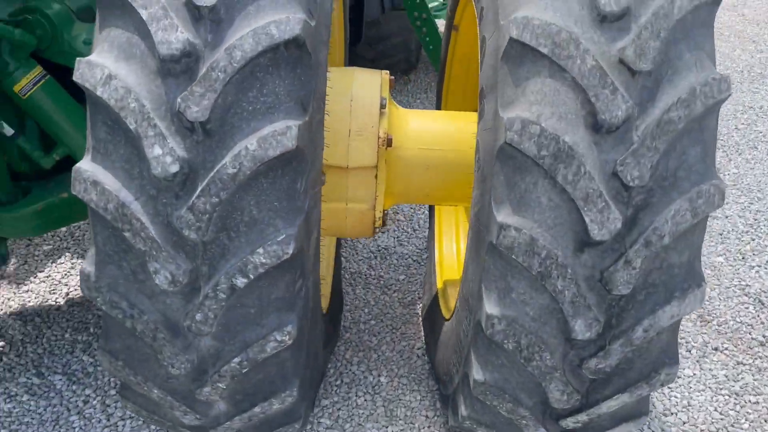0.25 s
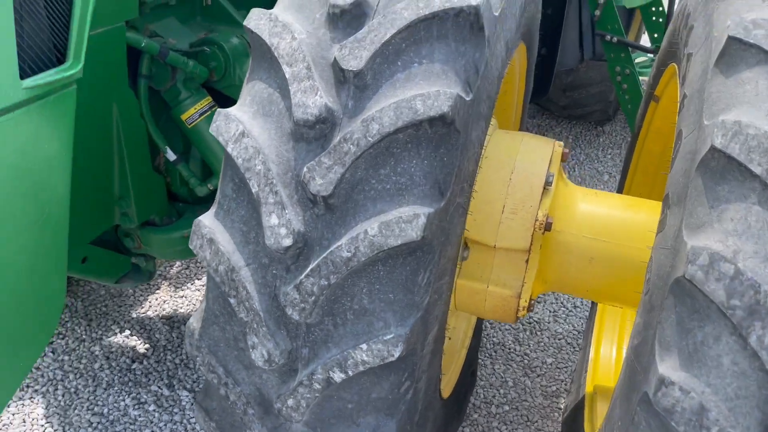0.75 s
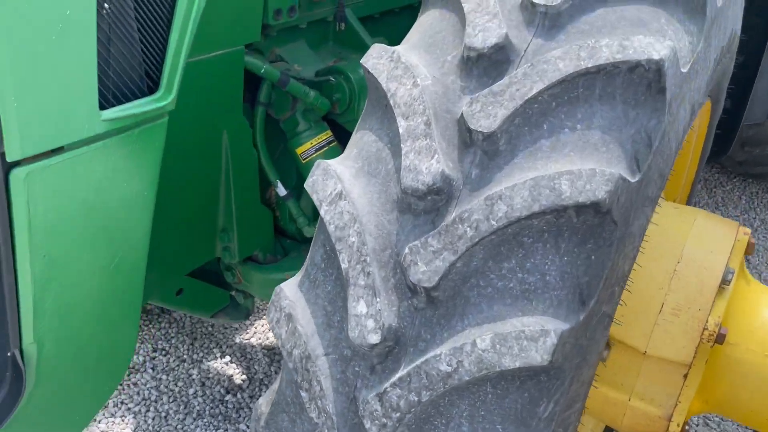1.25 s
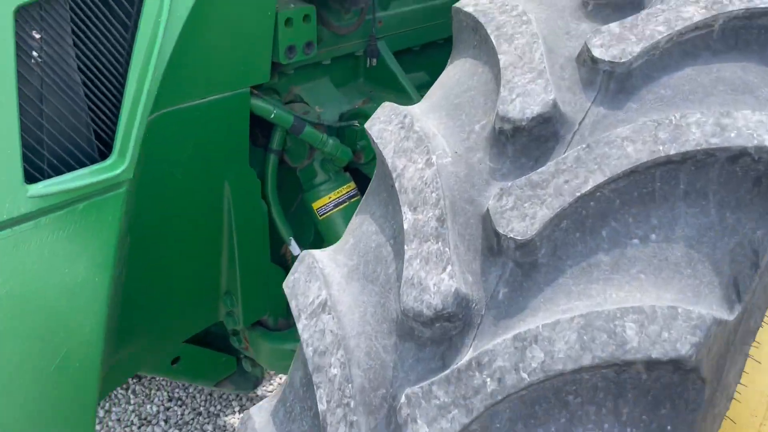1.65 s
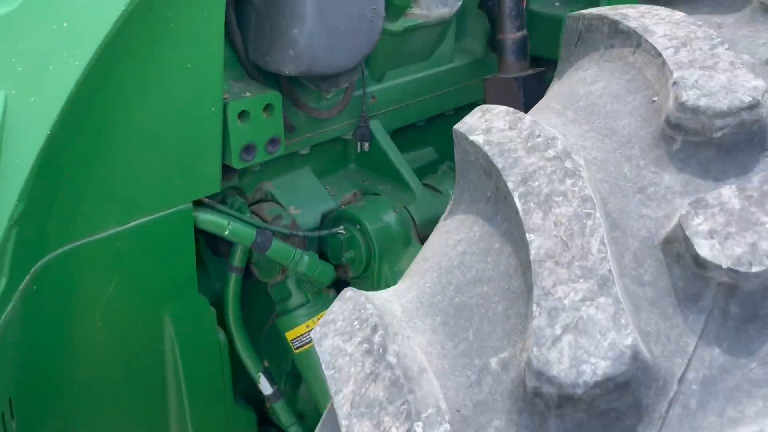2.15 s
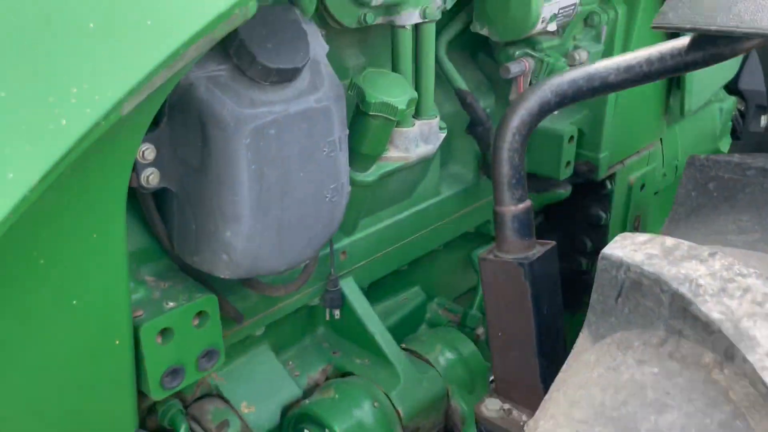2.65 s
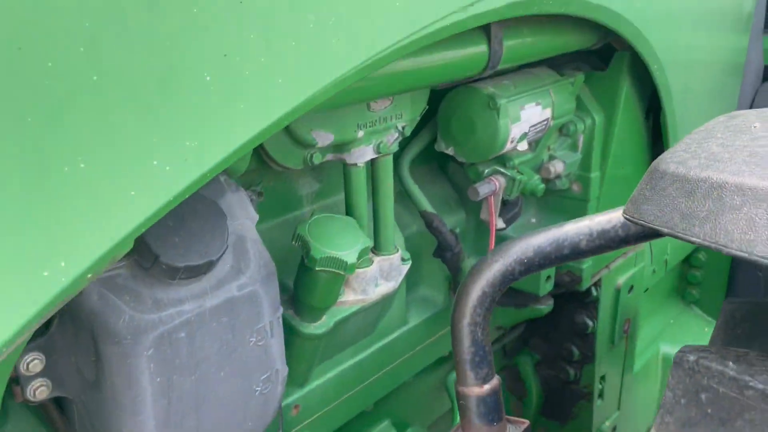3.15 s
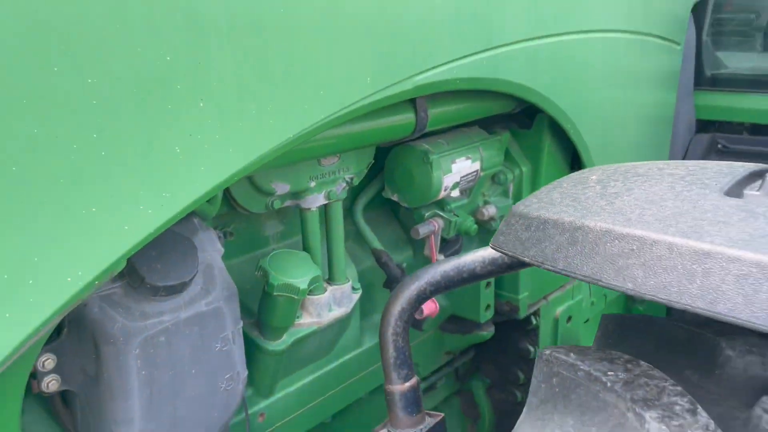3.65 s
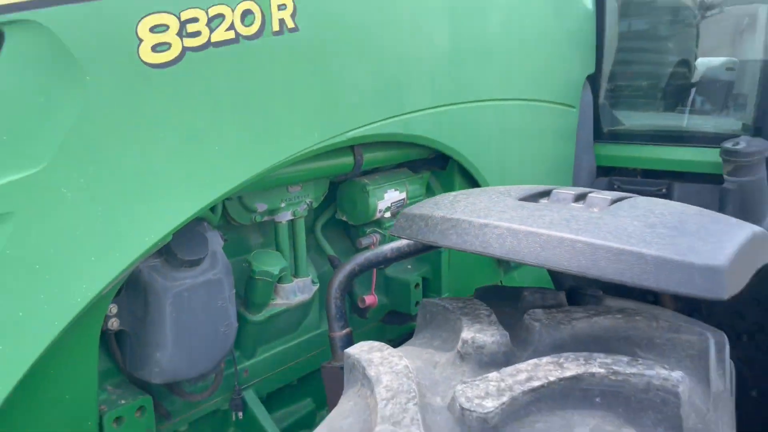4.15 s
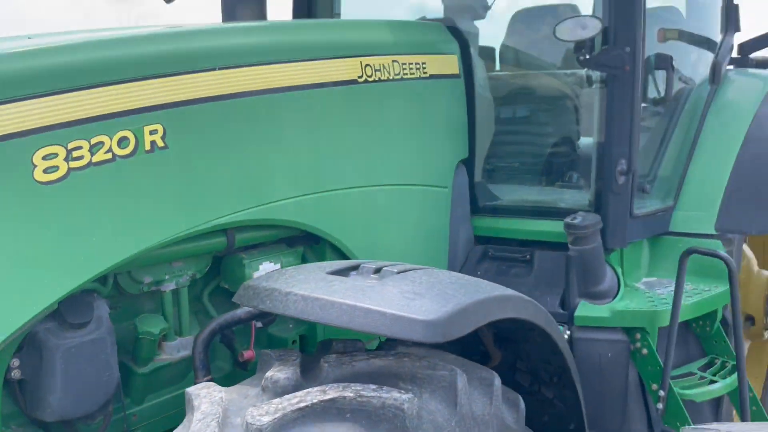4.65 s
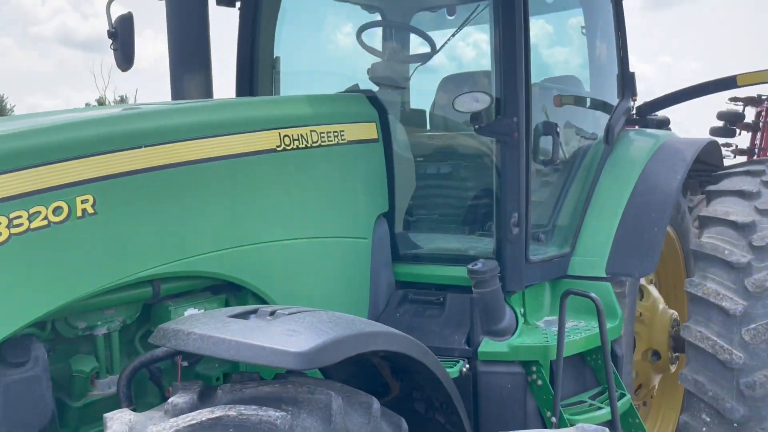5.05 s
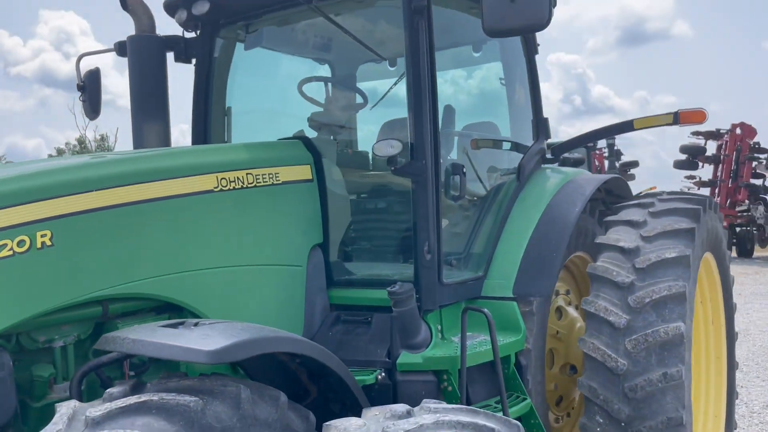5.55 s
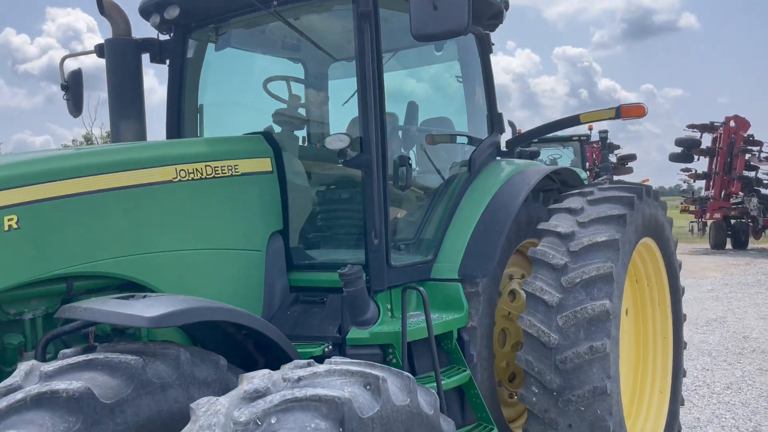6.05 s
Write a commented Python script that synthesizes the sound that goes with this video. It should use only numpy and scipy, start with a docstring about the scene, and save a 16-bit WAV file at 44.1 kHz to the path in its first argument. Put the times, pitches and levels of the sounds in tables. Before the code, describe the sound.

Heard from a microphone carried along its side in a gravel yard, a tractor's diesel engine ticks over evenly, with a droning fan and rattling, lightly ringing metal covers. It gets a little louder, then a blast of fan air buffets the microphone for over a second, booming and sputtering over the engine. Once the buffeting stops, the same idle is heard more softly.

```python
"""A six-cylinder diesel tractor idles at 900 rpm on a gravel yard as a hand-held mic walks along it. Every
firing knocks on the block and rings its covers; the fan hums, the exhaust throbs, gears whine, and tyre and
gravel throw the clatter back. Beside the engine bay the fan's air stream thumps and crackles on the mic while
the engine sinks away; past the stream the idle goes on, quieter."""
import sys
import numpy as np
from scipy import signal
from scipy.fft import rfft, irfft
from scipy.io import wavfile
from scipy.ndimage import uniform_filter1d, minimum_filter1d, map_coordinates

SR = 44100
rng = np.random.default_rng(int(sys.argv[2]) if len(sys.argv) > 2 else 0)


def put_to_file(sound):
    """Save the sound as 16-bit audio at rate SR, in the file named by the first command-line argument."""
    columns = np.atleast_2d(sound).T  # one column per channel
    safe = np.clip(columns, -1, 1)
    whole_steps = np.round(safe * 32767)
    wavfile.write(sys.argv[1], SR, whole_steps.astype(np.int16))


N = 277830

CRANK_HZ = 15
T = np.arange(N) / SR
HZ = np.maximum(np.arange(N // 2 + 1) * SR / N, 1)


def from_db(db):
    """Decibels to gain."""
    return 10 ** (np.asarray(db) / 20)


def rms_one(x):
    """Scale to unit power."""
    return x / np.sqrt(np.mean(x ** 2) + 1e-20)


def in_time(rows):
    """Each column of a curve table at every sample."""
    s, *columns = np.transpose(rows)
    return [np.interp(T, s, c) for c in columns]


def over_hz(points):
    """A spectrum table at every frequency."""
    hz, value = np.transpose(points)
    return np.interp(np.log(HZ), np.log(hz), value)


def drift(rate):
    """Smooth chance that changes about rate times a second; spread 1."""
    slow_hz = HZ[:4096]
    slow = irfft(rfft(rng.standard_normal(2 * len(slow_hz) - 2)) / (1 + (slow_hz / rate) ** 2) ** 2)
    return np.interp(T, np.linspace(0, T[-1], len(slow)), rms_one(slow))


def band(low_hz, high_hz):
    """Gain of a steep band-pass."""
    return 1 / np.sqrt((1 + (low_hz / HZ) ** 10) * (1 + (HZ / high_hz) ** 10))


def tone(cycles, waver_db, wander_rad):
    """A line of rms 1 that wavers in level and phase."""
    level, phase = drift(14), drift(9)
    return np.sqrt(2) * from_db(waver_db * level) * np.cos(2 * np.pi * cycles + wander_rad * phase)


def coloured(spectra, gain):
    """Mid and side spectra become a stereo pair of this colour; rms 1."""
    mid, side = irfft(spectra * gain, N)
    return rms_one(np.array([mid + side, mid - side]))


# Stereo image of the noises: f/Hz, left-right correlation/0-1
STEREO_LIKENESS = [(40, 1), (70, 0.78), (130, 0.81), (290, 0.82), (640, 0.55), (1400, 0.23), (3100, 0.57),
                   (6500, 0.72), (8000, 1), (16000, 1)]
def mid_and_side(white):
    """Two noises as mid and side spectra: narrow in the bass and the top, wide in the mids."""
    alike = np.clip(over_hz(STEREO_LIKENESS), 0, .99)
    return rfft(white) * np.sqrt([1 + alike, 1 - alike])


# Crank speed as heard, a little higher on the way in: t/s, f/Hz
CRANK_SPEED = [(0, 15.02), (2.6, 15.02), (3.8, 14.97), (6.3, 14.97)]
def crank_turns():
    """Turns of the crankshaft since the start."""
    return np.cumsum(in_time(CRANK_SPEED)[0]) / SR


# Accent of each cylinder, in firing order: level/dB
CYLINDER_ACCENTS = [9.5, 5.0, 6.3, 8.2, 5.3, 5.5]
def knocks(rise_s, fall_s, first_s=0.0021):
    """Envelope of the firings, three a turn: a quick attack and a decay, uneven in strength."""
    firings = 3 * crank_turns()
    at = np.searchsorted(firings, np.arange(int(firings[-1]))) + round(first_s * SR)
    blows = np.zeros(N)
    blows[at] = from_db(np.resize(CYLINDER_ACCENTS, len(at)) + rng.uniform(-5.5, 1, len(at)))
    age = T[:SR // 10]
    shape = (1 - np.exp(-age / rise_s)) * np.exp(-age / fall_s)
    return rms_one(signal.fftconvolve(blows, shape)[:N])


def shaking(repeat_share, ripple_db, renew_s):
    """Vibration that partly repeats every two turns, ribbed by modes that shift as the mic moves."""
    cycle = rng.standard_normal((2, round(2 * SR / CRANK_HZ)))
    looped = cycle[:, np.arange(N) % cycle.shape[1]]
    white = np.sqrt(repeat_share) * looped + np.sqrt(1 - repeat_share) * rng.standard_normal((2, N))
    hz, s, cells = signal.stft(white, SR, nperseg=4096)
    grid = np.meshgrid(hz / 35, s / renew_s, indexing="ij")   # a random gain every 35 Hz
    ribs = map_coordinates(rng.standard_normal((640, 64)), grid, order=3, mode="mirror")
    ripple = ribs * (hz / (hz + 1500))[:, None]   # shallower in the bass
    _, ribbed = signal.istft(cells * from_db(ripple_db * ripple), SR)
    return mid_and_side(ribbed[:, :N])


def ramp(start_s, length_s):
    """Goes from 0 to 1 in a straight line."""
    return np.clip((T - start_s) / length_s, 0, 1)


# Fader of the engine's hiss at the mic, deep down while the gust blows: t/s, level/dB
HISS_FADER = [(0, -38.5), (0.7, -37.5), (2.21, -32), (2.81, -33), (3.08, -48), (3.5, -47), (3.8, -44.5),
              (4.16, -48), (4.25, -43), (4.9, -46.5), (6.3, -50)]
# Rumble, drone, clatter, rattle: dip end/s, recovery/s, dip/dB, opening level/dB, share of hiss swing
LAYER_RIDES = [(4.9, 0.56, 7.5, -30, 0.9), (4.66, 0.14, 13.5, -21, 0.86), (4.6, 0.29, 4, -25, 0.94),
               (5.13, 0.39, -2, -32.0, 0.99)]
def engine_levels(dip_start_s=1.975, dip_fall_s=1):
    """All layers follow the hiss fader; the low ones dip further while the air stream blows and come back late."""
    hiss_db, = in_time(HISS_FADER)
    swing_db = hiss_db - hiss_db[0]
    sunk = ramp(dip_start_s, dip_fall_s)
    layers = [db + follows * swing_db - dip_db * sunk * (1 - ramp(end_s, recovery_s))
              for end_s, recovery_s, dip_db, db, follows in LAYER_RIDES]
    return layers + [hiss_db]


# EQ of the engine's body: f/Hz, level/dB
BODY_EQ = [(50, -2), (68, 1.5), (160, 0.5), (290, -2), (400, -9), (620, -4.5), (740, -10), (950, -13.5),
           (1200, -14), (1650, -14)]
# EQ of its metal clatter: f/Hz, level/dB
METAL_EQ = [(1400, -22), (1750, -19), (2150, -14.5), (2500, -19.5), (3100, -22), (3700, -21.5), (4350, -23),
            (5000, -27), (6000, -27), (7000, -25.5), (9700, -24.5), (11200, -26), (13000, -32.5),
            (14500, -26.5), (16000, -45)]
def block_clatter(rumble_db, drone_db, clatter_db, rattle_db, hiss_db, loose_db=2):
    """Firings shake the block, sharpest in the treble; each band rattles loosely in its own way."""
    vibration = shaking(repeat_share=0.3, ripple_db=3.0, renew_s=0.356)
    body, metal = from_db(over_hz(BODY_EQ)), from_db(over_hz(METAL_EQ))

    def part(gain, knock_share):
        knock = knocks(rise_s=0.0028, fall_s=0.015) * from_db(loose_db * np.tanh(drift(30)))
        return coloured(vibration, gain) * np.sqrt(1 - knock_share + knock_share * rms_one(knock) ** 2)

    out = from_db(rumble_db + 0.5) * part(body * band(49, 153), knock_share=0.11)
    out += from_db(drone_db - 4.0) * part(body * band(128, 330), knock_share=0.057)
    out += from_db((drone_db + clatter_db) / 2 - 4.5) * part(body * band(347, 546), knock_share=0.13)
    out += from_db(clatter_db - 1.3) * part(body * band(817, 1294), knock_share=0.19)
    out += from_db(rattle_db - 4.4) * part(metal * band(1680, 3650), knock_share=0.16)
    out += from_db(hiss_db - 0.74) * part(metal * band(4480, 5870), knock_share=0.41)
    out += from_db(hiss_db - 3.5) * part(metal * band(10660, 16500), knock_share=0.75)
    return out


# Upper partials of the fan: multiple of blade rate, level/dB against the drone fader
FAN_PARTIALS = [(3, -15), (4, -20), (5, -15.5), (7, -18.5)]
def fan_hum(hum_db, octave_db, drone_db, blades_per_crank_turn=7.63):
    """The cooling fan's passing blades make a hum with overtones."""
    blades = blades_per_crank_turn * crank_turns()
    hum = from_db(hum_db) * tone(blades, waver_db=0.35, wander_rad=0.071)
    hum += from_db(octave_db) * tone(2 * blades, waver_db=0.8, wander_rad=0.24)
    for k, db in FAN_PARTIALS:
        hum += from_db(drone_db + db) * tone(k * blades, waver_db=1.2, wander_rad=.06 * k)
    return hum


def exhaust_throb(level_db):
    """The exhaust pulses at the firing rate, three a turn: one deep tone."""
    return from_db(level_db) * tone(3 * crank_turns(), waver_db=1.5, wander_rad=0.096)


# Side tones come and go against the main whine: t/s, level/dB
SIDE_TONE_FADER = [(0, 2), (1.3, 4), (2.5, 5), (4.3, -1), (6.3, -6)]
# Trim of each side tone: level/dB
SIDE_TONE_TRIMS = [-10.5, -8, -10.5]
def gear_whine(level_db, main_order=72, side_orders=(57, 78, 84)):
    """Gears sing at multiples of crank speed: one main whine and three softer side tones."""
    turns = crank_turns()
    side_db, = in_time(SIDE_TONE_FADER)
    whine = tone(main_order * turns, waver_db=1.5, wander_rad=0.4)
    for order, db in zip(side_orders, SIDE_TONE_TRIMS):
        whine += from_db(side_db + db) * tone(order * turns, waver_db=1.5, wander_rad=0.45)
    return from_db(level_db) * whine


# Ringing covers: f/Hz, relative level/dB, t/s when the mic passes, swell there/dB
COVER_MODES = [(1953, -8, 1.35, 4), (2040, -18, 4.05, 12), (2183, -7, 2.3, 3), (2400, -14, 5.1, 7),
               (2802, -17.5, 2.2, 5), (3283, -18, 0.9, 6), (4073, -14, 4.05, 9), (4130, -17, 4.0, 6),
               (4289, -14.5, 2.1, 4), (4430, -17, 2.15, 5.5), (4470, -19, 3.3, 9), (5336, -20.5, 2.3, 5),
               (5700, -22, 1.1, 7)]
def cover_ring(level_db, width_hz=27, waver_db=0.7, half_pass_s=0.34):
    """The sharp tick of each firing rings the covers; each swells and fades as the mic passes it."""
    tick_noise = rng.standard_normal((2, N)) * knocks(rise_s=0.00052, fall_s=0.0026)
    ticks = coloured(mid_and_side(tick_noise), 1)
    radius = np.exp(-np.pi * width_hz / SR)
    out = np.zeros((2, N))
    for hz, db, passed_s, swell_db in COVER_MODES:
        resonator = [1, -2 * radius * np.cos(2 * np.pi * hz / SR), radius ** 2]
        ring = signal.lfilter([1, 0, -1], resonator, ticks)
        facing = 1 / (1 + ((T - passed_s) / half_pass_s) ** 4)
        out += from_db(db + swell_db * facing + waver_db * drift(2.7)) * rms_one(ring)
    return from_db(level_db) * out


# Early reflections along the walk: t/s, front tyre lag/ms, gravel lag/ms
ECHO_LAGS = [(0, 3, 5), (0.8, 1.67, 3.4), (1.8, 0.99, 4.5), (2.8, 0.71, 5.4), (4.2, 1.0, 3.3),
             (5, 2.53, 2.5), (6.3, 3.1, 1.73)]
def with_echoes(sound, tyre_db=-22, gravel_db=-16.5):
    """Tyre and gravel throw the clatter back; their changing lags sweep its colour."""
    bright = irfft(rfft(sound) * band(900, 6000), N)
    for lag_ms, db in zip(in_time(ECHO_LAGS), (tyre_db, gravel_db)):
        echo = np.array([np.interp(T - lag_ms / 1000, T, side) for side in bright])
        sound = sound + from_db(db) * echo
    return sound


# Faders of the tones along the walk: t/s, fan hum/dB, its octave/dB, exhaust/dB, gear whine/dB
TONE_FADERS = [(0, -16, -27.5, -25, -37), (0.52, -16, -23.5, -32, -43), (0.7, -15.8, -21.5, -31, -32.5),
               (1.25, -14.5, -22, -32, -31), (1.85, -12.5, -21.5, -35, -34), (2.25, -12, -31.5, -40, -44),
               (2.7, -19.5, -33, -39, -44), (3.2, -35, -41, -47, -62), (3.85, -43, -50, -62, -54),
               (4.15, -36, -54, -62, -59), (4.27, -36, -49, -63, -43), (4.72, -29.5, -42.5, -55, -42),
               (4.92, -26.5, -33, -51, -42), (5.3, -27.5, -33, -50, -41.5), (5.7, -28.5, -35, -46, -52),
               (6.3, -33, -34, -43, -57)]
def engine():
    """The idling diesel: block and covers with their echoes, plus fan, exhaust and gear tones."""
    rumble_db, drone_db, clatter_db, rattle_db, hiss_db = engine_levels()
    hum_db, octave_db, exhaust_db, whine_db = in_time(TONE_FADERS)
    block = block_clatter(rumble_db, drone_db, clatter_db, rattle_db, hiss_db)
    tones = fan_hum(hum_db, octave_db, drone_db) + exhaust_throb(exhaust_db) + gear_whine(whine_db)
    return with_echoes(block + cover_ring(hiss_db + 0.5)) + tones


# EQ of the wind on the mic: f/Hz, level/dB
WIND_EQ = [(22, -33), (36, -10), (55, 3), (130, -4), (220, 0), (550, -5), (800, -13.5), (1300, -20.5),
           (2300, -30), (4000, -45), (8000, -66)]
# Strength of the fan's air stream at the mic: t/s, level/dB
FLOW_FADER = [(2.36, -22), (2.44, -8), (2.78, -6), (2.89, 1.5), (3.08, -4.5), (3.19, -11), (3.38, -14),
              (3.48, -12), (3.61, -13.5), (3.7, -17.5), (3.82, -31), (3.89, -44)]
def air_stream(stall_db=-13, stall_slope=4.4):
    """Turbulence on the mic's ports: big slow eddies heave, and small ones tear off them in bursts."""
    inside = (T > FLOW_FADER[0][0]) & (T < FLOW_FADER[-1][0])
    flow_db, = in_time(FLOW_FADER)
    stalled_db = stall_slope * np.minimum(flow_db - stall_db, 0)   # weak flow leaves only big eddies
    air = mid_and_side(rng.standard_normal((2, N))) * from_db(over_hz(WIND_EQ))
    bursts = np.tanh(drift(78))

    def swirl(gain, burst_db):
        """Noise in quick lumps, levelled over a twentieth of a second."""
        lumps = coloured(air, gain) * from_db(burst_db * bursts)
        return lumps / np.sqrt(uniform_filter1d(np.mean(lumps ** 2, axis=0), size=SR // 20))

    heave = from_db(-11.5 + 0.8 * flow_db) * swirl(band(20, 147), burst_db=0)
    roar = from_db(-12.5 + 0.82 * flow_db + stalled_db) * swirl(band(123, 770), burst_db=5.0)
    flutter = from_db(-25 + 0.42 * flow_db + stalled_db) * swirl(band(810, 9000), burst_db=5.5)
    return inside * (heave + roar + flutter)


# Wind thumps, diving in pitch: t/s, peak level/dB, start f/Hz, end f/Hz, length/s
THUMP_CUES = [(2.44, -1, 410, 54.6, 0.017), (2.509, -11, 111, 50.3, 0.029), (2.6, -9, 149, 55, 0.028),
              (2.686, -3, 332, 75.4, 0.021), (2.809, -6, 420, 59.6, 0.021), (2.88, -3, 760, 350, 0.0068),
              (2.888, -7, 224, 60.4, 0.018), (2.956, -7, 420, 200, 0.014), (3.029, -7, 196, 70, 0.014),
              (3.061, -4.5, 760, 98, 0.0183), (3.104, -0.5, 185, 55, 0.017), (3.13, -4, 623, 181, 0.0087),
              (3.457, -18, 151, 49.7, 0.024), (3.659, -16.5, 554, 121, 0.014)]
def thumps():
    """A big vortex sweeps over both ports: a few swings of pressure that slow down as it passes."""
    out = np.zeros(N)
    for s, db, from_hz, to_hz, length_s in THUMP_CUES:
        progress = np.linspace(0, 1, round(length_s * SR))
        cycles = np.cumsum(from_hz * (to_hz / from_hz) ** progress) / SR
        dive = np.sin(2 * np.pi * (cycles + rng.random()))
        start = round(s * SR)
        out[start:start + len(dive)] += from_db(db) * signal.get_window(("tukey", .5), len(dive)) * dive
    return out


# Wind crackles on the ports: t/s, relative level/dB, top f/Hz, length/s
EDDY_CUES = [(2.577, -12.5, 1010, 0.0052), (2.606, -8, 407, 0.0052), (2.779, -4.5, 670, 0.0074),
             (2.842, -13, 2600, 0.0086), (2.924, -12, 900, 0.006), (2.96, -18.5, 2880, 0.0054),
             (3.019, -19, 2300, 0.006), (3.027, -10.5, 1100, 0.0091), (3.094, -10.5, 920, 0.0064),
             (3.165, -16, 600, 0.0089), (3.206, -26, 1400, 0.0046), (3.218, -17.5, 1050, 0.011),
             (3.237, -11.5, 1650, 0.0044), (3.253, -15, 1680, 0.0046), (3.341, -20, 2720, 0.0078),
             (3.404, -24, 2720, 0.0045), (3.429, -18.5, 920, 0.0061), (3.444, -21, 1000, 0.0069),
             (3.465, -19, 1200, 0.0071), (3.491, -23, 1700, 0.0073), (3.524, -20, 1650, 0.0046),
             (3.535, -28, 1600, 0.0038), (3.553, -22, 900, 0.0067), (3.569, -20, 2730, 0.0034),
             (3.583, -19, 1500, 0.0042), (3.603, -28, 1800, 0.005), (3.658, -22, 2960, 0.0031)]
def eddies(level_db, slap_share):
    """Each eddy is a rough puff around one pressure jump; the smaller it is, the higher it reaches."""
    out = np.zeros((2, N))
    for s, db, top_hz, length_s in list(EDDY_CUES) + sputter():
        age = T[:SR // 12] / length_s
        noise = rng.standard_normal(len(age)) + .5 * rng.standard_normal((2, len(age)))
        puff = noise * np.sqrt(age) * np.exp(-age ** 2)
        slap = signal.unit_impulse(len(age), np.searchsorted(age, .5))
        air = np.sqrt(1 - slap_share) * rms_one(puff) + np.sqrt(slap_share) * rms_one(slap)
        colour = np.vstack([signal.butter(2, [top_hz / 4, top_hz], "band", fs=SR, output="sos"),
                            signal.butter(4, top_hz, fs=SR, output="sos")])
        eddy = rms_one(signal.sosfilt(colour, air)) / np.sqrt(age[-1])   # unit power over its length
        start = round(s * SR)
        out[:, start:start + len(age)] += from_db(db + level_db) * eddy
    return out


def sputter(count=6, first_s=3.44, last_s=3.50, db=-25, low_hz=1710, high_hz=3350, length_s=0.00503):
    """Cues for tiny eddies of random size that sputter unevenly in the last gust."""
    jitter, _, pitch = rng.random((count, 3)).T
    times = first_s + (last_s - first_s) * (np.arange(count) + jitter) / count
    tops_hz = low_hz * (high_hz / low_hz) ** pitch
    return [(s, db, top_hz, length_s) for s, top_hz in zip(times, tops_hz)]


# Phase lead of the mic's left port: f/Hz, phase/rad
LEFT_LEAD = [(20, 0), (5800, 0), (6800, -1.1), (8200, -3.14), (11700, -6.28), (14900, -9.42), (16000, -9.7)]
# Its sensitivity against the right port: f/Hz, level/dB
LEFT_EQ = [(120, -.5), (250, .5), (500, 1.9), (1000, .3), (2000, 2.2), (4500, 1.6), (7500, 0)]
def scene():
    """Engine and air stream at a pair of mic ports whose phases part in the treble."""
    sound = engine() + air_stream() + thumps() + eddies(level_db=-1.5, slap_share=0.16)
    sound *= np.minimum(1, np.minimum(T, T[::-1]) / .003)   # 3 ms fades
    lead_rad = np.interp(HZ, *np.transpose(LEFT_LEAD))
    left = from_db(over_hz(LEFT_EQ) / 2) * np.exp(.5j * lead_rad)
    return irfft(rfft(sound) * np.array([left, 1 / left]), N)


CUTOFF_HZ = 15300
def record(dry):
    """A fast limiter holds the peaks; the deepest bass and the top are cut."""
    room = np.minimum(1, .92 / (np.abs(dry).max(axis=0) + 1e-9))
    gain = uniform_filter1d(minimum_filter1d(room, size=300), size=300)
    passband = band(24, SR) / np.sqrt(1 + (HZ / CUTOFF_HZ) ** 300)
    return irfft(rfft(dry * gain) * passband, N)


dry = scene()
out = record(dry)
put_to_file(out)
```